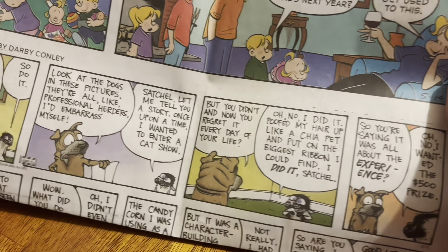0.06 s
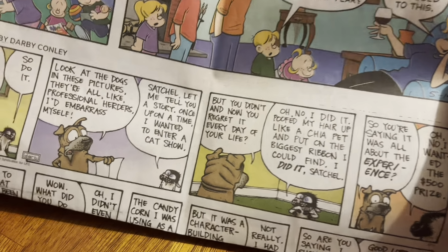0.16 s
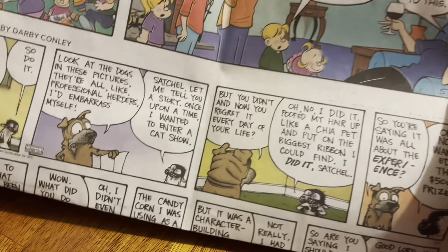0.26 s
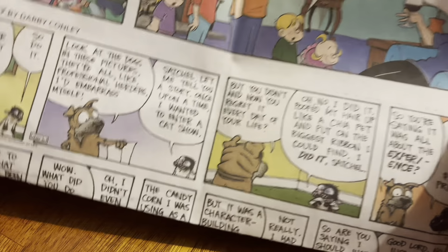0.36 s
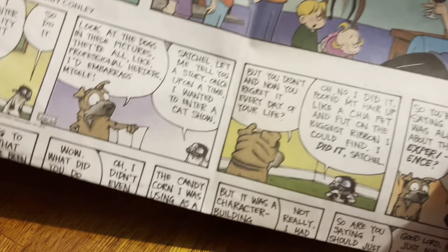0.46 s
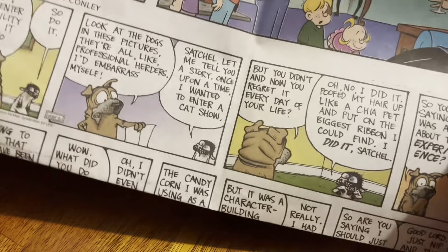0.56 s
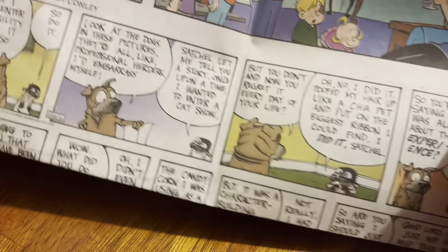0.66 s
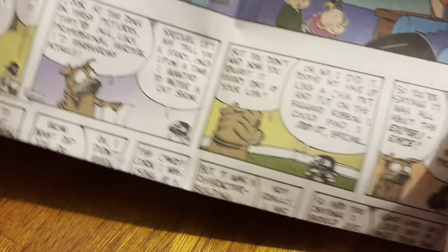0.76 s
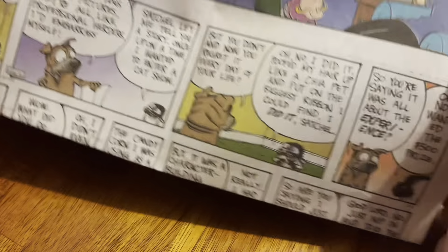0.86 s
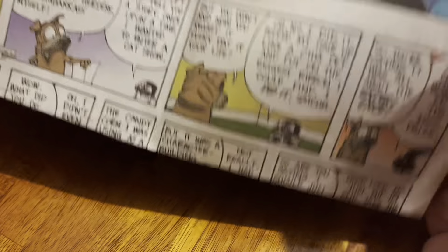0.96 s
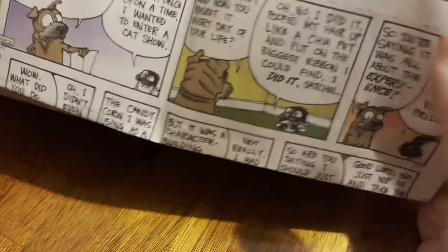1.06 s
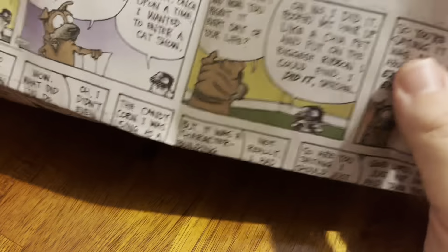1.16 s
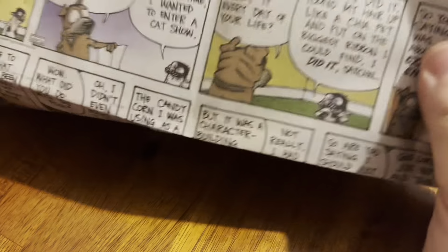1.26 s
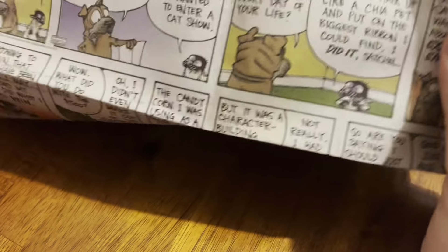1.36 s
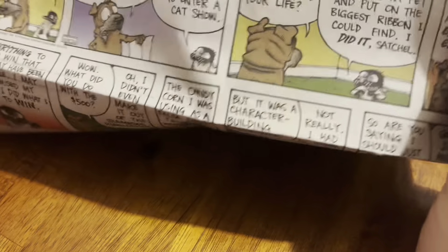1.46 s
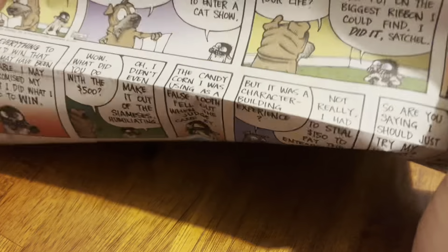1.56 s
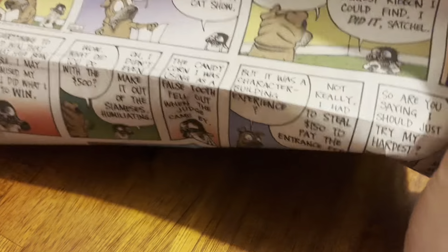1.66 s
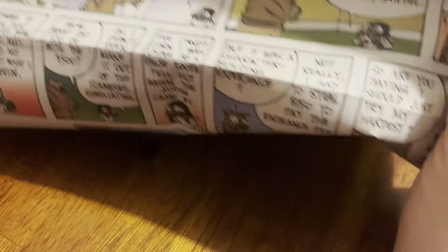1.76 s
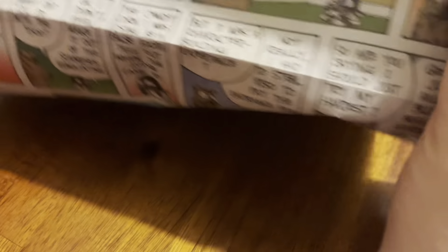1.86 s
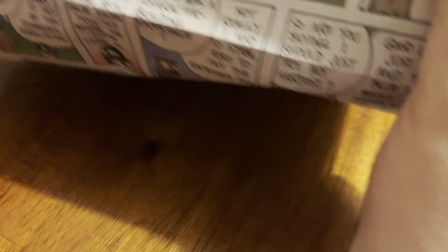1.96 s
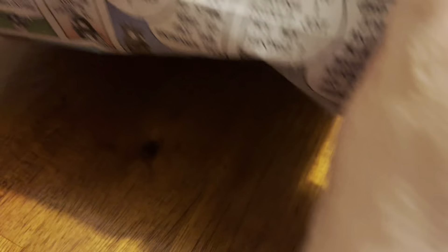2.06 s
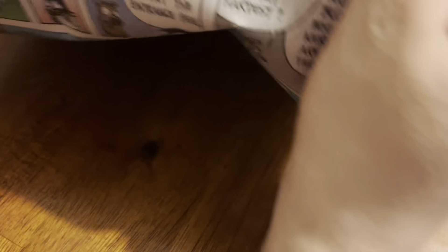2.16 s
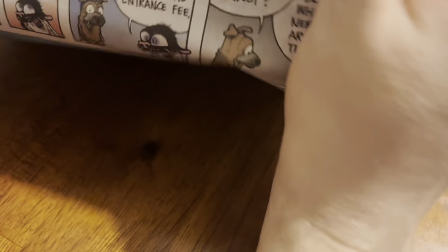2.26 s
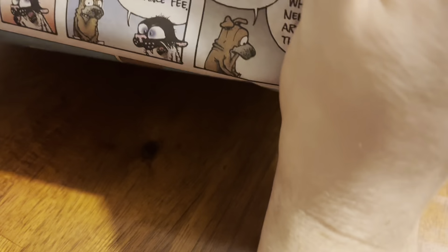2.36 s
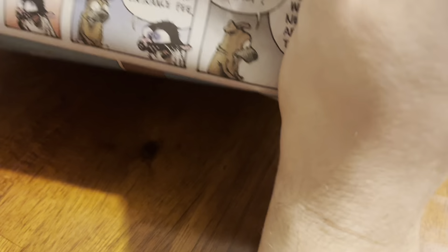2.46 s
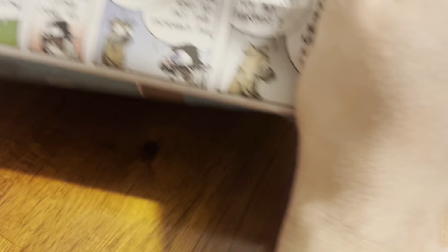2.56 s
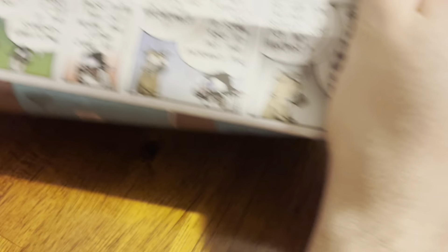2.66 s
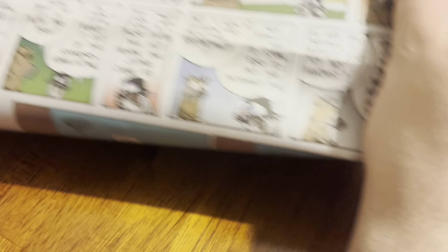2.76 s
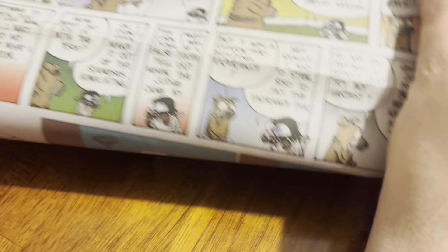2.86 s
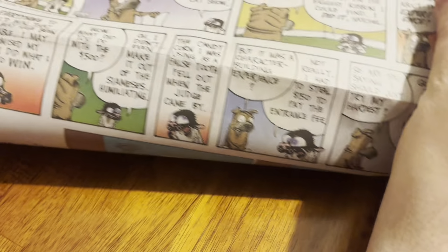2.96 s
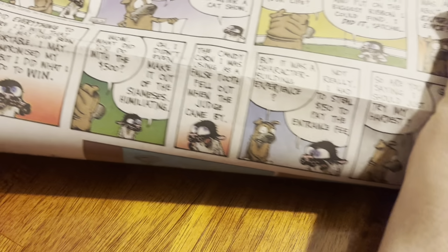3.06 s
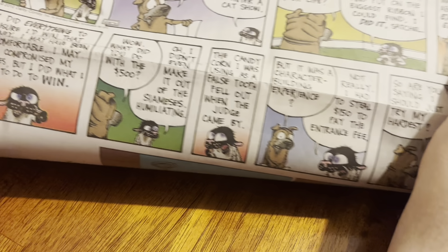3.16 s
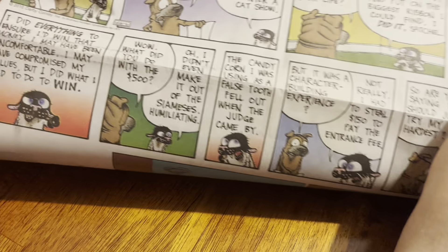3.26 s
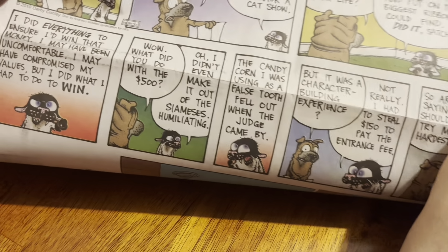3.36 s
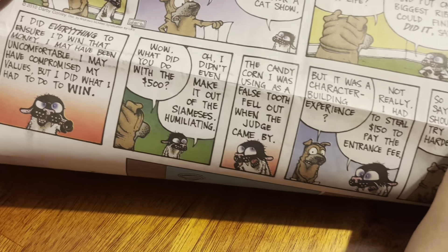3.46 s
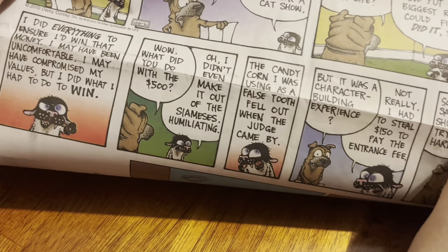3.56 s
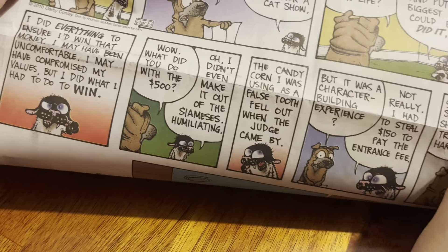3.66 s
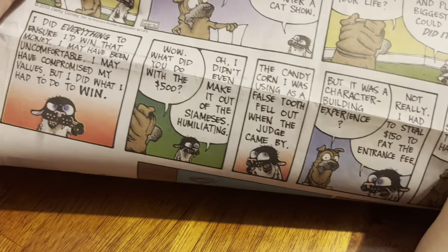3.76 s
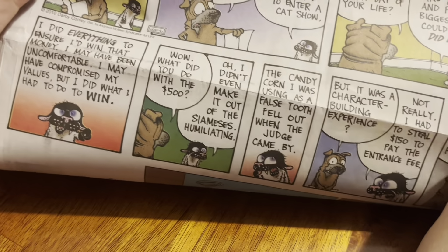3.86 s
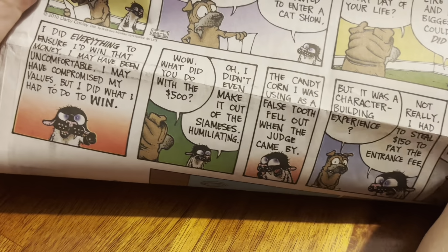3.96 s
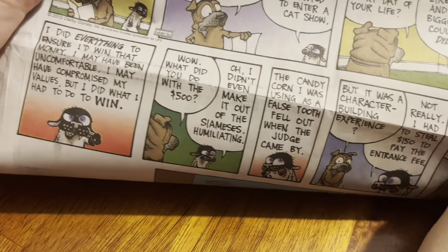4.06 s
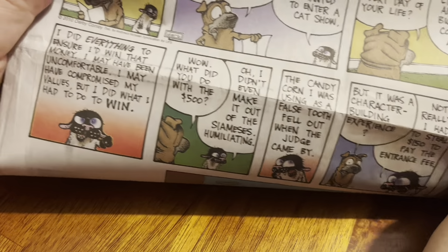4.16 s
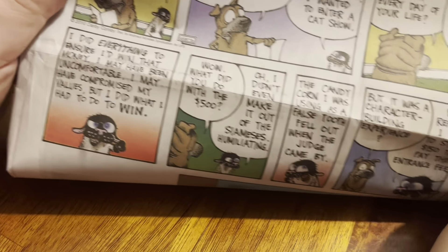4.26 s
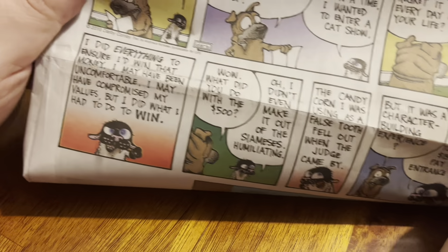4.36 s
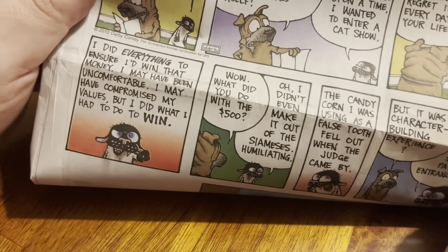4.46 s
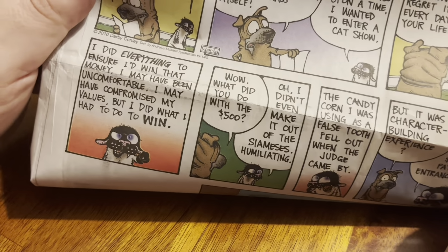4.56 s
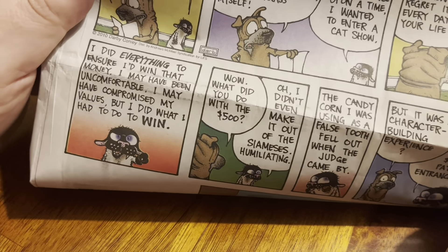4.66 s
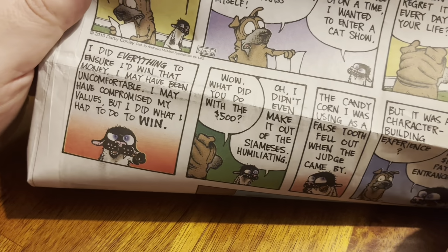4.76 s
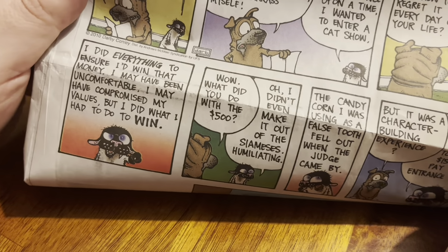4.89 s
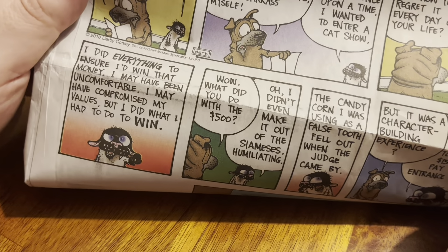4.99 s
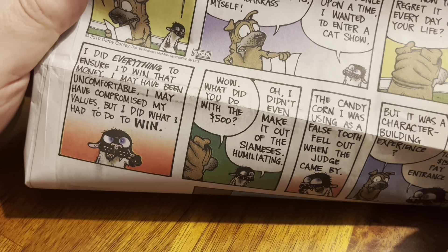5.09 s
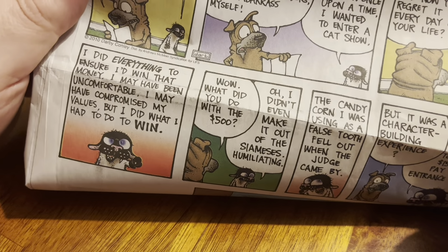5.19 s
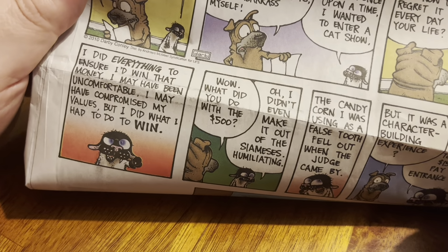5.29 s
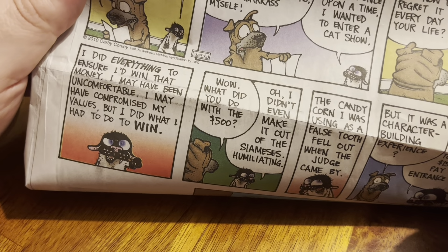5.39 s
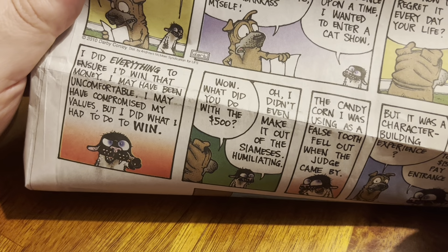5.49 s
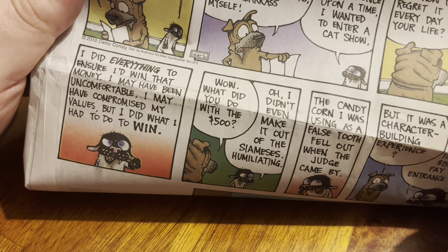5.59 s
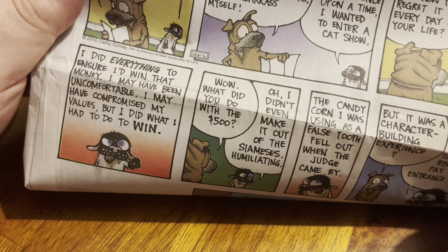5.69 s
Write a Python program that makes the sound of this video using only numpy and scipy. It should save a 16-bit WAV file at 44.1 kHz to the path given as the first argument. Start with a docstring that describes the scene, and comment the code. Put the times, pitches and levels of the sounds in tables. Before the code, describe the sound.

Hands fold thin newsprint very near the microphones. It starts with soft crinkling, swells after one second into loud dry snaps with hollow panel pops, peaks again past two seconds, then eases. Another brief crackle comes just before four seconds, then light rubbing and tiny ticks fade into a dull indoor hum, with hardly any echo.

```python
"""Creases of a newspaper buckle with sharp snaps as it is folded by hand above a wooden table in a quiet room.
Each snap is a pulse and a fading noise flutter, split into registers, that ring a patch of paper.
Between snaps the sheet flaps, flexes, crinkles and slides: noise and tiny slips, coloured and swelled.
Panels pop as damped sine swings, and a dragging finger chirrs as gliding narrow-band noise.
Two microphone ports and short reflections carry the paper; the room's hum and whirr remain at the end."""
import sys
import numpy as np
from scipy import signal
from scipy.fft import rfft, irfft, next_fast_len
from scipy.io import wavfile

SR = 44100
rng = np.random.default_rng(int(sys.argv[2]) if len(sys.argv) > 2 else 0)


def generate_wav(sig):
    """Save sig (samples, or channels by samples) to the path in sys.argv[1] as 16-bit PCM at SR."""
    pcm = np.round(np.clip(np.atleast_2d(sig).T, -1, 1) * 32767).astype(np.int16)
    wavfile.write(sys.argv[1], SR, pcm)


N = 252693
TIME = np.arange(N) / SR  # s
PADDED = next_fast_len(N + SR // 2)
BIN_HZ = np.maximum(np.arange(PADDED // 2 + 1) * SR / PADDED, 1)

# Creases buckling. Each row: start in seconds, ring decay time in ms, level over 5 ms in dB before tilt and trims,
# tilt in dB per octave (dull knock below 0, sharp tick above), pitch of the paper beside the crease in Hz,
# gain of that pitch in dB.
CREASE_SNAPS = [(0.015, 2.1, -49.5, -6, 1430.0, 8.3), (0.0347, 1.1, -55, -6.5, 1300, 18),
                (0.0654, 17, -45, -7.5, 1340.0, 10.7), (0.1608, 3.3, -49, -4, 1360, 12.4),
                (0.2938, 1.3, -46.5, -1.5, 888.0, 6.9), (0.327, 2.7, -47, 0, 4380, 8.6),
                (0.366, 5.6, -43.5, -1, 1020.0, 6.2), (0.4134, 1.4, -50.5, -8, 450.0, 3.2),
                (0.5357, 6, -47.5, -5, 830.0, 6.4), (0.5611, 11, -42.5, -3.5, 1340.0, 5.8),
                (0.6186, 4.8, -31.5, 1, 1070, 8.2),  (0.6643, 0.3, -31.5, 8, 1550, 9.2),
                (0.6843, 0.92, -38, 7.5, 5300, 9.8), (0.6993, 1.5, -45.5, -5, 3970.0, 6.0),
                (0.724, 1.1, -44, 9, 5800, 9.3), (0.7472, 0.27, -33.5, 3, 5500, 10.4),
                (0.9883, 4.1, -33.5, 1.5, 2680, 8.1), (1.0155, 3.2, -35, -2, 2500, 6.8),
                (1.0342, 2.4, -37.5, 1, 7830.0, 7.8), (1.0539, 3.9, -26.5, 1.5, 5370, 10),
                (1.0854, 0.6, -32.5, 3, 3860, 9.4), (1.096, 0.85, -27.5, 2.5, 4660, 9),
                (1.124, 3.9, -34, -5, 3710.0, 10.5), (1.1517, 1.7, -36.5, -4, 632.0, 5),
                (1.1595, 0.91, -31, -3, 6380.0, 3.0), (1.2, 0.6, -35, 2, 4000, 3.6),
                (1.2059, 1.8, -31, -3, 3460.0, 6), (1.235, 1.5, -36, 2, 3500, 6),
                (1.2542, 3.5, -28, 1.5, 3160, 9.6), (1.263, 1.5, -32, 0, 4285, 12),
                (1.29, 1.2, -26.5, 5, 450.0, 3.0), (1.301, 5.4, -22, 0, 5480, 10.5),
                (1.33, 3.2, -22.5, 1.5, 6380.0, 4.4), (1.3514, 1.2, -39, 0.5, 3500, 10),
                (1.3721, 0.47, -23.5, 4, 11000, 6.2), (1.435, 2.1, -23.5, -1.5, 7800, 5.5),
                (1.4752, 1, -34, 1.5, 3020.0, 9), (1.4852, 1.1, -26, 4.5, 4130, 10.3),
                (1.5061, 2.2, -27.5, 3, 3530, 6.9), (1.5093, 1.4, -25, -0.5, 4000, 3.9),
                (1.5169, 1.5, -28.5, -4, 3230.0, 3.0), (1.6281, 2.1, -41, -3.5, 1250.0, 5.1),
                (1.6682, 0.47, -34.0, -3, 4200, 14.2), (1.708, 0.55, -31.5, 6.5, 775.0, 11.4),
                (1.761, 2, -35, -1, 3370, 8.9), (1.7787, 3, -38.5, 2.5, 2820.0, 6.6),
                (1.809, 3, -27, 0, 446, 3), (1.8486, 4.3, -28, -1.5, 450.0, 3.7),
                (1.932, 2.4, -36, -2, 516.0, 4.9), (1.9654, 0.31, -35, 2, 3660, 5.5),
                (2.0319, 2.3, -39, -2.5, 440, 11), (2.0681, 1.2, -34, 0, 452, 9.8),
                (2.1154, 0.59, -40, 3.5, 3900, 16.7), (2.1369, 1.1, -38.5, -5, 3230.0, 4.5),
                (2.2289, 3.5, -22.5, 1.5, 2900, 6), (2.2409, 2.5, -37.5, -1, 7800, 18),
                (2.3099, 0.23, -35, 2.5, 2240, 7.6), (2.416, 6.3, -55.5, -13.5, 951.0, 4.1),
                (2.5775, 1.4, -21.5, 1, 1274, 6.8), (2.592, 1.6, -37, 8, 450.0, 7.7),
                (2.6283, 0.5, -41, 4.5, 7800, 8.9), (2.641, 1.7, -41, 1.5, 516.0, 3.0),
                (2.7618, 1.2, -49, -11, 516.0, 2), (2.7747, 0.31, -28.5, 1, 5960.0, 6.7),
                (2.8103, 1.8, -38.5, 0, 450.0, 5.7), (2.8707, 2.8, -52.5, -7.5, 1040, 18),
                (2.879, 1.1, -42, -0.5, 1180, 16.7), (2.9175, 0.57, -49.5, -13.5, 1100, 5.4),
                (2.9298, 2.7, -53, -12, 440, 2.1), (2.9976, 3.3, -38.5, -1.5, 1880.0, 4.1),
                (3.0413, 1.6, -40.5, -3, 450.0, 3.0), (3.0539, 1.9, -30, -1.5, 9900, 5.4),
                (3.2068, 2.8, -42, -2.5, 1270, 12), (3.3172, 1.5, -45.5, 2, 5570.0, 9.3),
                (3.721, 1.6, -50.5, -6, 1500, 12), (3.774, 2, -47, -7, 951.0, 3.0),
                (3.8045, 1.5, -26.5, 2, 2250, 11.7), (3.816, 1.8, -26, -1, 7200, 10.4),
                (3.8263, 2.5, -30, 0.5, 899, 8), (3.9085, 2.1, -52.5, 7.5, 10200, 17.8),
                (3.9208, 2.2, -29.5, 1, 3260, 7.1), (3.9903, 1.5, -52.5, 5, 888.0, 18),
                (4.077, 4.5, -45.5, -7.5, 2400, 5.4), (4.333, 0.25, -36.5, -3.0, 1400, 11.4),
                (4.3948, 2.1, -52.5, -7, 1640.0, 3.6), (4.4913, 1.8, -59.5, -7.5, 1245, 6.0),
                (4.5053, 1.4, -52, -5.5, 1260, 7.8), (4.583, 2.3, -49.5, -5.5, 12000, 19),
                (4.633, 1, -67.5, 5.5, 10900, 9.4), (4.8831, 1.2, -49.5, -1.5, 1320, 15.8),
                (4.893, 1, -61, 2.5, 11140, 11), (5.018, 0.77, -76, 4, 11000, 9),
                (5.267, 4, -73.5, 5, 11000, 9.8), (5.408, 0.83, -72, 0.5, 11000, 9),
                (5.6828, 2.6, -65, -12.5, 1340.0, 6.9)]
# Edges of a snap's thud, knock, crack and tick registers. Each entry: frequency in Hz.
REGISTER_EDGES_HZ = [300, 1000, 2500, 6000, 16000]
# Colour of the top end of every snap. Each row: frequency in Hz, gain in dB.
SNAP_TOP_COLOUR = [(2500, -2), (5800, -8.5), (8000, 0), (11000, -3.5), (13000, -6), (16000, -6.5)]
TILT_PIVOT_HZ = 2000
# Weaker snaps keep to the middle range: loss in dB per dB of weakness and squared octave from the pivot.
FULL_SNAP_DB, SOFT_NARROWING = -21, 0.047

# Colours of the moving sheet. Each row: frequency in Hz, relative spectral density in dB.
FLAP_COLOUR = [(22, -44), (35, -10), (55, 2.5), (90, -2.5), (130, -3.5), (175, -7.5), (250, -6.5),
               (330, -18.5), (600, -42)]
FLEX_COLOUR = [(150, -18), (300, 5.5), (400, 4.5), (520, -3), (900, -2), (1500, -8), (2000, -13.5),
               (4000, -34.5)]
CRINKLE_COLOUR = [(700, -18), (1500, 5), (2100, 3), (3800, 5), (4600, -0.5), (6000, -18), (7200, 0),
                  (12000, -19.5)]
SLIDE_COLOUR = [(2000, -1.5), (6000, -2), (8000, -4.5), (10000, -1.5), (13500, -6), (16000, -10.5)]
# Colour of the small wrinkles. Each row: frequency in Hz, relative level in dB.
WRINKLE_COLOUR = [(300, 1.5), (900, 3), (2500, -4), (4500, -6.5), (10000, -13)]
# The hands bend the sheet. Each row: start in seconds, length in seconds, level in dB before the layer trims,
# crispness in dB (soft flap below 0, crinkle above).
HAND_BENDS = [(0.054, 0.021, -44.5, -1.5), (0.395, 0.053, -52.5, -7.5), (0.495, 0.012, -55, 11),
              (0.612, 0.036, -40, 2), (0.674, 0.028, -42.5, 5), (0.717, 0.061, -42, 5),
              (0.84, 0.051, -43, -4), (1.008, 0.062, -34.5, 2.5), (1.109, 0.027, -42, -7.5),
              (1.195, 0.036, -36, 8.5), (1.261, 0.075, -28, 4.5), (1.434, 0.03, -32, -4.5),
              (1.494, 0.032, -25.5, -2), (1.55, 0.13, -43, -5.5), (1.785, 0.061, -35.5, 0),
              (1.92, 0.037, -44.5, -7), (2.071, 0.044, -37, -3.5), (2.161, 0.082, -34.5, -2),
              (2.228, 0.034, -30, -0.5), (2.285, 0.083, -48, -6), (2.59, 0.035, -40.5, 4),
              (2.75, 0.092, -43, -2.5), (2.86, 0.12, -57.5, -10.5), (3.05, 0.032, -52.5, -3),
              (3.811, 0.036, -38, 1.5), (3.85, 0.072, -58.5, 8), (3.909, 0.018, -43.5, 7),
              (4.17, 0.25, -57.5, -5)]
BEND_SWELL_SHARE = 0.48  # part of a bend spent loading the paper; in the rest it gives way
BEND_EDGE_DB = 4  # how far below its height a bend starts and ends
# The sheet never lies quite still in the hands. Each row: time in seconds, swaying in dB, creaking in dB,
# both before the layer trims.
SHEET_UNREST = [(0.0, -55.5, -54.5), (0.47, -50, -61), (0.78, -47, -50.5), (0.94, -49, -49),
                (1.08, -34.5, -39.5), (1.88, -39, -46), (2.01, -45.5, -49), (2.12, -39.5, -47),
                (2.32, -35.5, -43), (2.44, -45, -66), (2.52, -44, -48.5), (2.68, -46.5, -52.5),
                (2.9, -53.5, -52), (3.15, -53, -56.5), (3.48, -51, -59.5), (3.6, -64, -61),
                (3.87, -52, -52.5), (4.349, -51, -64), (4.52, -62.5, -69), (4.95, -62.5, -79),
                (5.73, -68, -87)]
# One face is drawn over another. Each row: start in seconds, length in seconds, level in dB before grip and trim.
FACE_SLIDES = [(0.028, 0.23, -59), (0.243, 0.14, -53.5), (0.505, 0.015, -45), (0.63, 0.03, -48),
               (0.68, 0.13, -40.5), (0.795, 0.43, -48.5), (0.945, 0.16, -42.5), (1.198, .135, -40),
               (1.405, 0.5, -39.5), (1.902, .13, -50.5), (2.044, 0.26, -39.5), (2.32, .18, -54),
               (2.498, 0.045, -46), (2.597, 0.19, -44.5), (2.776, 0.067, -41), (2.86, 0.22, -45.5),
               (3.1, 0.12, -54.5), (3.274, 0.21, -58.5), (3.495, 0.16, -69), (3.678, 0.23, -51.5),
               (3.968, 0.2, -55.5), (4.195, 0.17, -52), (4.715, 0.18, -69), (5.07, 0.058, -75),
               (5.248, .06, -82)]
SLIDE_ATTACK_DB_PER_S, SLIDE_RELEASE_DB_PER_S = 449, 201.5
# Whole panels of the page popping over. Each row: start in seconds, level in dB before the swing's envelope,
# frequency in Hz.
PANEL_POPS = [(0.412, -31, 413), (1.034, -23, 98.2), (1.122, -22.5, 200), (1.142, -18.5, 83.9),
              (1.213, -25, 99.5), (1.258, -15.5, 300), (1.264, -26.5, 109), (1.296, -22.5, 110),
              (1.331, -17.5, 130), (1.377, -17.5, 231), (1.439, -16.5, 125.8), (1.495, -13.5, 70.5),
              (1.516, -16.5, 94.9), (1.585, -23.5, 90.7), (1.761, -18, 302), (1.808, -17.5, 102.5),
              (1.85, -19, 266), (2.09, -23.5, 99.7), (2.164, -19, 377), (2.191, -18.5, 600),
              (2.212, -16.5, 480), (2.23, -12.5, 543), (2.237, -12, 170), (2.243, -17.5, 516),
              (2.248, -15, 104.6), (3.057, -28, 252), (3.828, -22.5, 257), (3.928, -27, 101.1),
              (4.607, -33, 61.7), (5.41, -37, 212)]
# A finger drags on the paper. Each row: start in seconds, length in seconds, level in dB before the swell,
# frequency at the start in Hz, frequency at the end in Hz.
FINGER_DRAGS = [(3.845, 0.075, -53, 2400, 1725), (4.121, 0.287, -58, 1467, 1555)]

# Something nearby rings faintly along. Each row: frequency in Hz, level against the paper in dB.
SYMPATHETIC_RINGS = [(555, -11), (961, -8.5), (2033, -3.5), (3007, -9), (3263, -16.5), (3595, -8),
                     (4369, -5), (5499, -1.5)]
# Share of the sound that reaches the two ports differently, off hands and table. Each row: frequency in Hz,
# share in dB.
STRAY_SHARE = [(60, -21.5), (150, -14), (300, -28), (650, -16), (1100, -3.5), (1500, -4.5), (2100, -16.5),
               (4000, -11), (8400, -30), (14000, -27.5)]
# Phase between the ports. Each row: frequency in Hz, lag of the right port in radians.
RIGHT_PORT_LAG = [(450, 0.2), (800, 0.9), (1130, 1.1), (1420, -1), (1620, -3), (1760, -6), (3000, -5.5),
                  (4900, -5.5), (5700, -7.5), (6500, -7.5), (8400, -9.5), (11200, -11.5), (13000, -14),
                  (14800, -15.5)]
# Level between the ports. Each row: frequency in Hz, left minus right in dB.
LEFT_RIGHT_BALANCE = [(60, 0.5), (170, 2), (400, 1), (700, -2), (1100, 4.5), (1550, -1.5), (3200, 4),
                      (5200, 1.4), (6500, 2.5), (8300, -1)]
ROOM_T60_S = 0.038
# The room's steady hum and whirr. Each row: frequency in Hz, relative spectral density in dB.
ROOM_COLOUR = [(22, -29), (46, 3), (58, 8), (85, -23), (122, -1.5), (160, -14.5), (250, -9.5), (365, -23.5),
               (412, -23), (470, -22.5), (680, -34), (1050, -26.5), (1750, -19.5), (2350, -42), (3000, -53),
               (4300, -53), (4900, -47.5), (5600, -59.5), (11000, -59), (15000, -58)]
CUTOFF_HZ = 15800


def snaps(flutter, tail_db, tail_ms, register_db, patch_q):
    """Snap-through buckling: a crease flips with a pulse and a flutter and rings its patch; direct, stray rows."""
    t = np.arange(1536) / SR
    start, ring_ms, level_db, tilt_db, patch_hz, patch_db = np.transpose(CREASE_SNAPS)
    ring_s = ring_ms[:, None, None] / 1000
    draws = rng.standard_normal((len(start), len(register_db), 2, len(t)))
    flip = np.sign(draws[:, 0, :, 0])  # a crease pops in or out
    shapes = 0
    for k, (low, high) in enumerate(zip(REGISTER_EDGES_HZ, REGISTER_EDGES_HZ[1:])):
        tail_s = tail_ms / 1000 * np.sqrt(1000 / low)  # longest in the lows
        decay = np.exp(-t / ring_s) + from_db(tail_db) * np.exp(-t / tail_s)
        drive = flutter * draws[:, k] * decay
        drive[..., 0] = flip * (-1) ** k
        band = signal.butter(2, [low, high], "band", fs=SR, output="sos")
        wave = signal.sosfilt(band, drive)
        wave /= np.sqrt(np.sum(wave ** 2, axis=-1, keepdims=True) / (.005 * SR))  # rms 1 over 5 ms
        octaves = np.log2(np.sqrt(low * high) / TILT_PIVOT_HZ)
        narrowing_db = SOFT_NARROWING * np.maximum(FULL_SNAP_DB - level_db, 0) * octaves ** 2
        wave_db = level_db + tilt_db * octaves - narrowing_db + register_db[k]
        shapes = shapes + wave * from_db(wave_db)[:, None, None]
    out = np.zeros((2, N + len(t)))
    for s, shape, hz, db in zip(start, shapes, patch_hz, patch_db):
        i = int(s * SR)
        out[:, i:i + len(t)] += shape + (from_db(db) - 1) * resonance(shape, hz, patch_q)
    return out[:, :N]


def resonance(x, hz, q):
    """Simple resonance: band-pass ring of a patch of paper, with gain 1 at its centre."""
    return signal.lfilter(*signal.iirpeak(hz, q, fs=SR), x + 1e-18)


def dispersed(x, slowest_s, knee_hz):
    """Dispersion: low bending waves cross the sheet more slowly, so each snap chirps downward."""
    return filtered(x, np.exp(-2j * np.pi * slowest_s * knee_hz * np.log1p(BIN_HZ / knee_hz)))


def sheet():
    """Plate bending and dry friction: the page pushes air, panels flex, wrinkles give way and faces rub."""
    flap_db, flex_db, crinkle_db = bending()
    catch_db = 1.55 * drift(80)  # the paper catches and lets go, in flex and crinkle at once
    coarse = fibres(per_s=450, spread_db=2.2, smooth=.6, clump_db=1)
    fine = fibres(per_s=700, spread_db=2.8, smooth=.28, clump_db=1.5)
    finest = fibres(per_s=5900, spread_db=-0.5, smooth=0.93, clump_db=1.5)
    shoves = fibres(per_s=150, spread_db=.5, smooth=.55, clump_db=1)
    sway_db, grip_db = 2 * drift(25), 1.7 * drift(35)
    flap = from_db(flap_db + sway_db + 1.0) * coloured(shoves, FLAP_COLOUR)  # uneven thumps of air
    flex = from_db(flex_db + catch_db - 2.0) * coloured(coarse, FLEX_COLOUR)  # stiff panels bending
    crinkle = from_db(crinkle_db + catch_db - 4.5) * coloured(fine, CRINKLE_COLOUR)
    ticks = from_db((flex_db + crinkle_db) / 2 - 6.5) * wrinkles(per_s=150, spread_db=2.6, q=4.5)
    slide = from_db(sliding() + grip_db - 3.5) * coloured(finest, SLIDE_COLOUR)
    return flap + flex + crinkle + ticks + slide


def bending():
    """Addition of powers: each bend swells and gives way over the unrest; flap, flex and crinkle levels in dB."""
    s, sway_db, creak_db = np.transpose(SHEET_UNREST)
    power = from_db([np.interp(TIME, s, db) for db in (sway_db, creak_db, creak_db)]) ** 2
    for start, length, level_db, crisp_db in HAND_BENDS:
        near = np.abs(TIME - start - length / 2) < 2 * length
        past_height = (TIME[near] - start) / length - BEND_SWELL_SHARE
        side = np.where(past_height < 0, BEND_SWELL_SHARE, 1 - BEND_SWELL_SHARE)
        shape_db = -BEND_EDGE_DB * (past_height / side) ** 2
        layer_db = crisp_db * np.array([[-1], [0], [1]])  # crisp bends crinkle more and flap less
        power[:, near] += from_db(level_db + shape_db + layer_db) ** 2
    return 10 * np.log10(power)


def fibres(per_s, spread_db, smooth, clump_db):
    """Stick-slip friction: tiny uneven slips over smooth friction, in clumps; rows: direct and stray sound."""
    sizes = from_db(spread_db * np.minimum(rng.exponential(1, N), 4)) * rng.choice([-1, 1], (2, N))
    slips = rms_one(sizes * (rng.random(N) < per_s / SR))
    friction = smooth * rng.standard_normal((2, N))
    return (slips + friction) * from_db(clump_db * drift(130))


def wrinkles(per_s, spread_db, q):
    """Impulse excitation of resonators: sparse wrinkle ticks, each with a pitch; rows: direct and stray."""
    sizes = from_db(spread_db * np.minimum(rng.exponential(1, N), 3)) * rng.choice([-1, 1], (2, N))
    clicks = sizes * (rng.random(N) < per_s / SR)
    pitches = np.geomspace(600, 6000, 12)  # Hz
    dealt = rng.integers(len(pitches), size=N)
    ticks = 0
    for k, hz in enumerate(pitches):
        ticks = ticks + resonance(clicks * (dealt == k), hz, q) * (hz / TILT_PIVOT_HZ) ** -.2
    return dispersed(coloured(ticks + 0.45 * clicks, WRINKLE_COLOUR), slowest_s=0.00394, knee_hz=405.0)


def sliding():
    """Friction level follows sliding speed: each stroke speeds up, holds and slows down; the loudest, in dB."""
    strokes = []
    for start, length, level_db in FACE_SLIDES:
        attack_db = SLIDE_ATTACK_DB_PER_S * np.maximum(start - TIME, 0)
        release_db = SLIDE_RELEASE_DB_PER_S * np.maximum(TIME - start - length, 0)
        strokes.append(level_db - attack_db - release_db)
    return np.max(strokes, axis=0)


def pops(cycles):
    """Damped free vibration: a panel pops over and its swing dies away by 1/e every `cycles` turns."""
    out = np.zeros(N)
    for s, level_db, hz in PANEL_POPS:
        i = int(s * SR)
        turns = hz * TIME[:min(SR // 8, N - i)]
        envelope = np.exp(-turns / cycles) * (1 - np.exp(-np.pi * turns))
        out[i:i + len(turns)] += from_db(level_db) * np.sin(2 * np.pi * turns) * envelope
    return out


def drags(width_hz, broken_db):
    """Stick-slip chirr: a rough band swells, glides and fades, broken as the finger catches."""
    out = np.zeros(N)
    for start, length, level_db, first_hz, last_hz in FINGER_DRAGS:
        along = np.clip((TIME - start) / length, 0, 1)
        phase = 2 * np.pi * np.cumsum(first_hz + (last_hz - first_hz) * along) / SR
        chirr = drift(width_hz) * np.sin(phase) + drift(width_hz) * np.cos(phase)
        broken = rms_one(chirr * from_db(broken_db * drift(110)))
        out += from_db(level_db) * np.sin(np.pi * along) * broken
    return out


def sympathy(width_hz):
    """Sympathetic resonance: frequency response of narrow resonances that ring along."""
    return 1 + sum(from_db(db) / (1 + 2j * (BIN_HZ - hz) / width_hz) for hz, db in SYMPATHETIC_RINGS)


def ports(paper):
    """Interaural-style phase and level differences: the right port lags low down and leads higher up."""
    share = from_db(at_hz(STRAY_SHARE)) ** 2
    direct, stray = rfft(paper, PADDED) * np.sqrt([1 - share, share]) * sympathy(width_hz=15.0)
    lean = from_db(at_hz(LEFT_RIGHT_BALANCE) / 2)
    left = (direct + stray) * lean
    right = (direct - stray) * np.exp(-1j * at_hz(RIGHT_PORT_LAG)) / lean
    return irfft(np.array([left, right]), PADDED)[:, :N]


def room(x, wet_db, wall_hz):
    """Exponential reverberant decay: dull, diffuse reflections, different at each port, with little bass."""
    since = np.maximum(TIME - .004, 0)
    echoes = rng.standard_normal((2, N)) * (since > 0) * from_db(-60 * since / ROOM_T60_S)
    echoes /= np.sqrt(np.sum(echoes ** 2, axis=1, keepdims=True))
    walls = 1 / (1 + 1j * BIN_HZ / wall_hz) / (1 + 250 / (1j * BIN_HZ))
    return from_db(wet_db) * filtered(x, rfft(echoes, PADDED) * walls)


def room_tone(level_db, apart_hz):
    """Coherence of a diffuse field: steady hum and whirr, alike on both sides in the bass, unrelated higher up."""
    shared, own = rng.standard_normal(N), rng.standard_normal((2, N))
    alike = 1 / (1 + (BIN_HZ / apart_hz) ** 2)
    air = filtered(shared, np.sqrt(alike)) + filtered(own, np.sqrt(1 - alike))
    return from_db(level_db) * coloured(air, ROOM_COLOUR)


def hum(hz, level_db):
    """Pure tone: a faint hum whose level and pitch wander slightly."""
    phase = 2 * np.pi * np.cumsum(hz + .7 * drift(10)) / SR
    return from_db(level_db + .8 * drift(6)) * np.sin(phase)


def from_db(db):
    """Decibel law: level to amplitude gain."""
    return 10 ** (np.asarray(db) / 20)


def rms_one(x):
    """Effective value: scale to unit rms."""
    return x / np.sqrt(np.mean(x ** 2) + 1e-20)


def at_hz(points):
    """Logarithmic pitch scale: read a table on a log-frequency axis."""
    hz, value = np.transpose(points)
    return np.interp(np.log(BIN_HZ), np.log(hz), value)


def filtered(x, response):
    """Convolution theorem: apply a complex frequency response."""
    return irfft(rfft(x, PADDED) * response, PADDED)[..., :N]


def coloured(x, spectrum):
    """Minimum phase: causal filter that falls away outside the given spectrum; rms 1."""
    below = np.maximum(np.log2(spectrum[0][0] / BIN_HZ), 0)
    above = np.maximum(np.log2(BIN_HZ / spectrum[-1][0]), 0)
    gain_db = at_hz(spectrum) - 20 * (below + above)
    cepstrum = irfft(np.log(from_db(gain_db)), PADDED)
    causal = 2 * cepstrum[:PADDED // 2]  # folding the cepstrum makes the phase minimal
    return rms_one(filtered(x, np.exp(rfft(causal, PADDED))))


def drift(rate):
    """Band-limited randomness: a wander of rms 1 with `rate` random knots a second."""
    knots = rng.standard_normal(4096)
    return rms_one(np.interp(TIME * rate, np.arange(len(knots)), knots))


def scene():
    """Superposition: paper close by, its reflections and the quiet room."""
    creases = snaps(flutter=0.41, tail_db=-16.0, tail_ms=8.9, register_db=[-1.5, -1.2, 1.5, 0.0], patch_q=4.2)
    creases = dispersed(creases, slowest_s=.0045, knee_hz=200)
    creases = filtered(creases, from_db(at_hz(SNAP_TOP_COLOUR)))
    paper = creases + sheet() + pops(cycles=1.0) + drags(width_hz=520, broken_db=4)
    hums = hum(hz=405, level_db=-69.5) + hum(hz=450, level_db=-83.5) + hum(hz=118.5, level_db=-60.0)
    background = room_tone(level_db=-53.0, apart_hz=645) + hums
    return ports(paper) + room(paper[0], wet_db=-18.5, wall_hz=6050) + background


def record(dry):
    """Band limits and soft saturation: deepest bass removed, highest peaks rounded, top cut steeply."""
    lean = signal.sosfilt(signal.butter(3, 33, "high", fs=SR, output="sos"), dry)
    rounded = 1.1 * np.tanh(lean / 1.1)
    return filtered(rounded, 1 / np.sqrt(1 + (BIN_HZ / CUTOFF_HZ) ** 160))


dry = scene()
out = record(dry)
generate_wav(out)
```